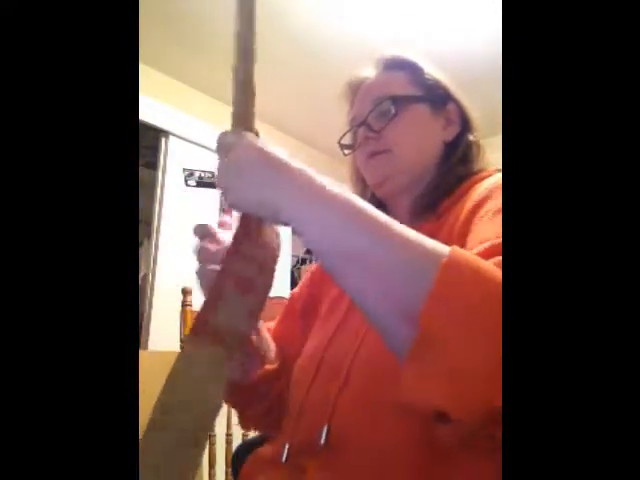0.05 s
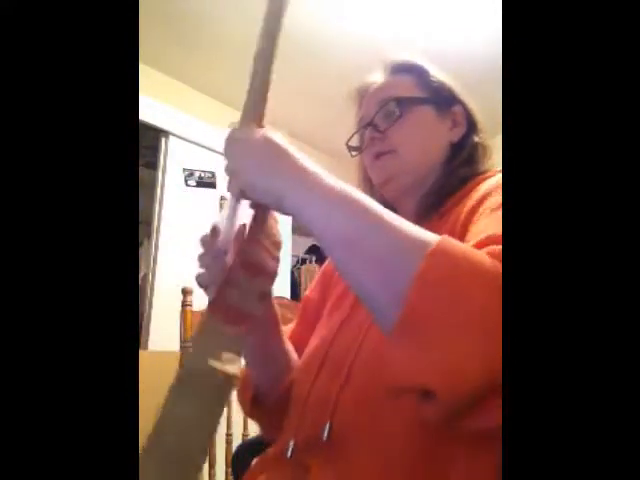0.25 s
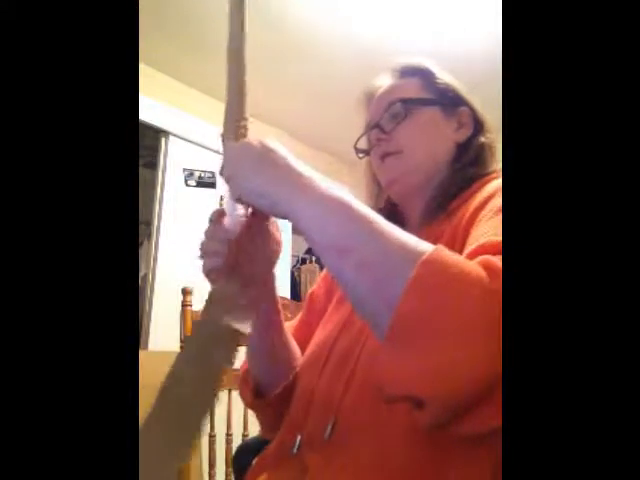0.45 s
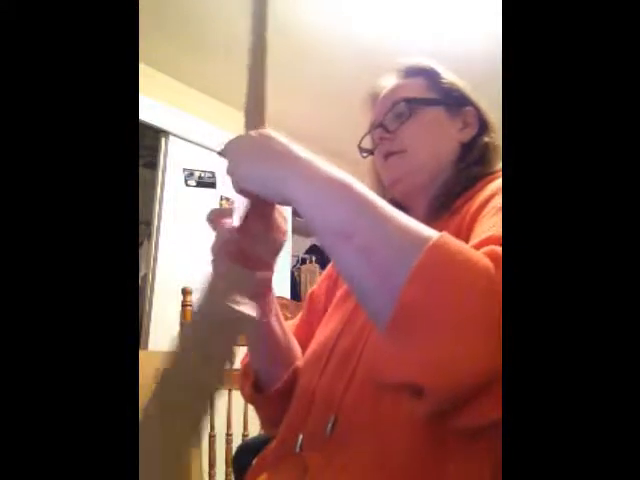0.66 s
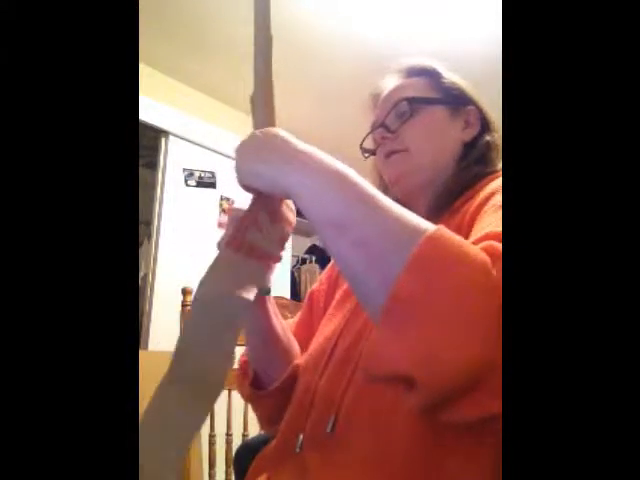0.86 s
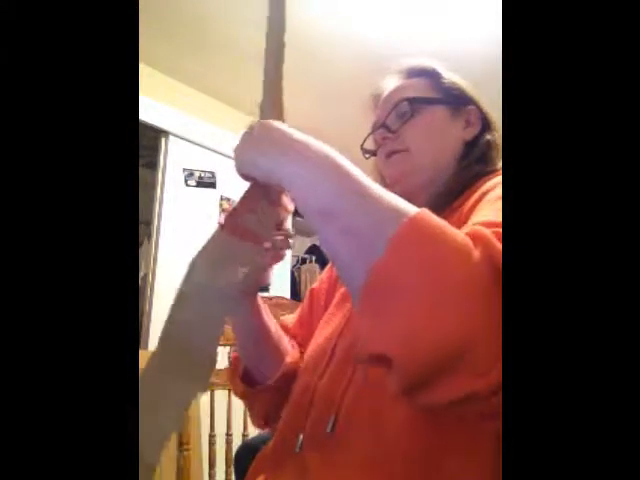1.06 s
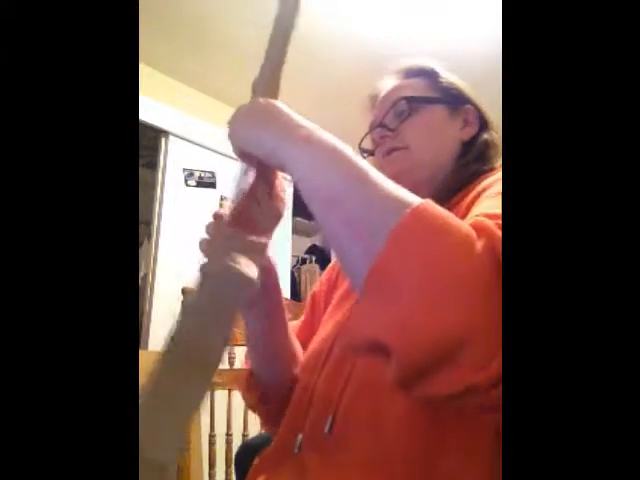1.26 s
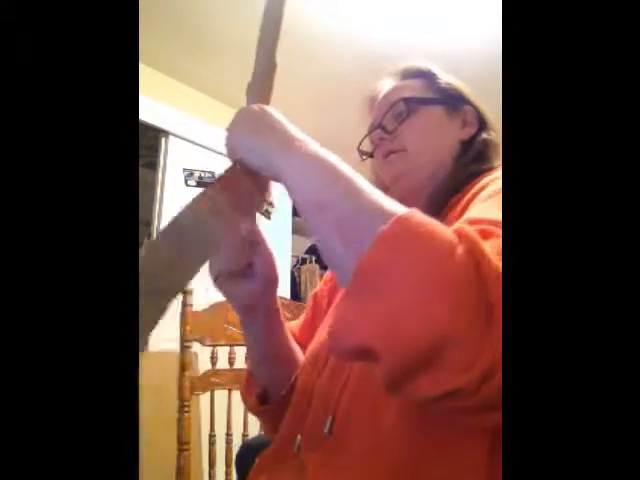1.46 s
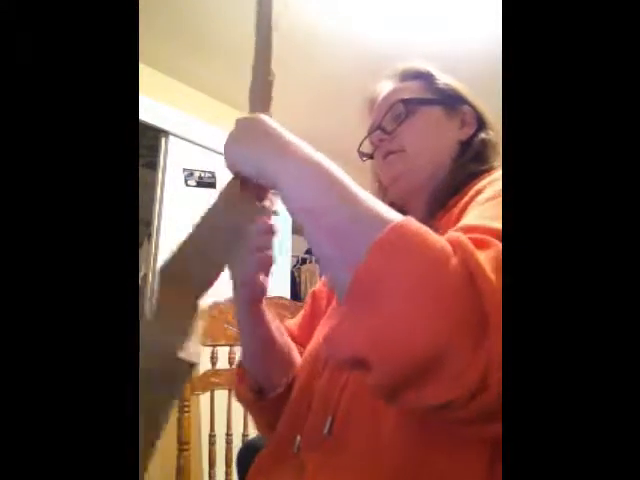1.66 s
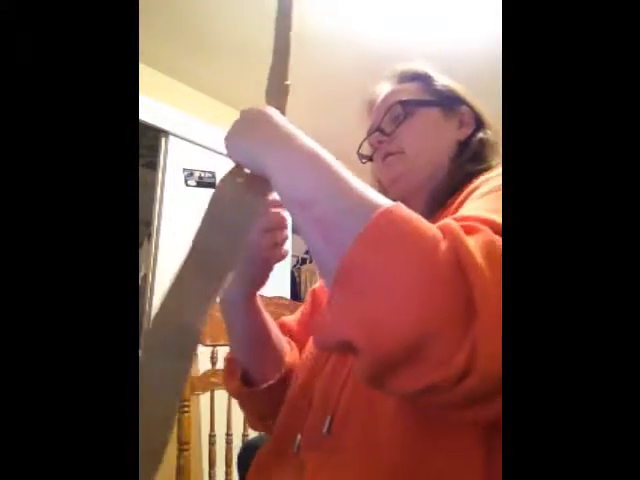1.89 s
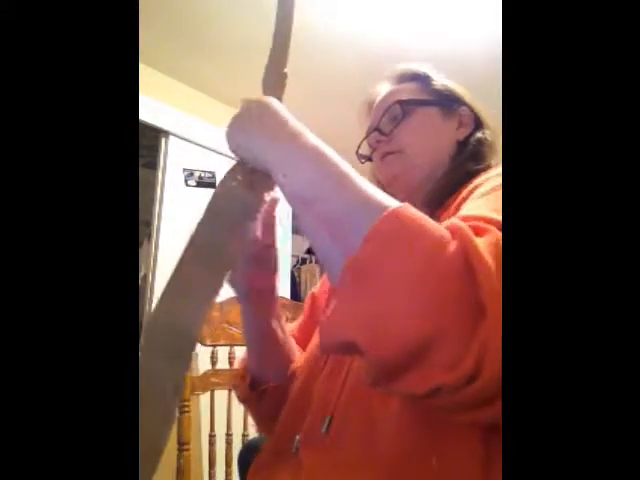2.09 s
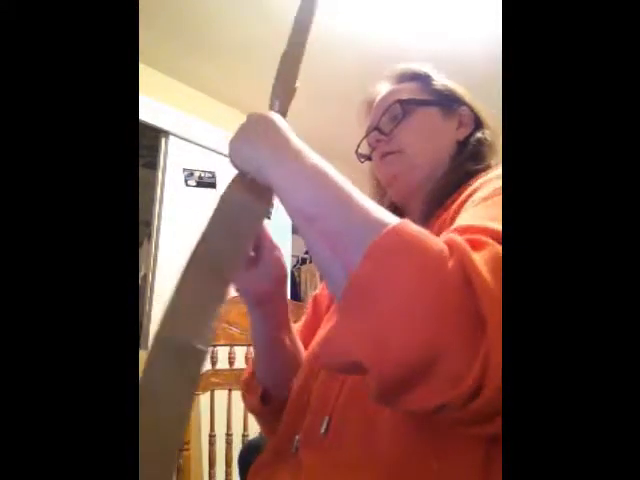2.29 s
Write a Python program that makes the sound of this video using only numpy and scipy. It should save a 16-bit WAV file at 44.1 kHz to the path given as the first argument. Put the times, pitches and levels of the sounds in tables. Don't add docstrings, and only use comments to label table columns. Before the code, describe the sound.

Stiff paper crinkles continuously right beside a small microphone, with sharp crease snaps clustering around the middle and a loudest crack soon after, then thinner rustling; faint rod knocks and room hum behind.

```python
import sys
import numpy as np
from scipy import signal
from scipy.fft import rfft, irfft, next_fast_len
from scipy.io import wavfile

SR = 44100
rng = np.random.default_rng(int(sys.argv[2]) if len(sys.argv) > 2 else 0)


def materialize(psi):
    bounded = np.clip(np.atleast_2d(psi).T, -1, 1)
    quanta = np.round(bounded * 32767).astype(np.int16)
    wavfile.write(sys.argv[1], SR, quanta)


def nominal_scale(level):
    x = np.asarray(level, float) / 20
    return 10 ** x


N = 102753

# f/Hz, level/dB [per Hz]
ROOM_TONE = [(25, -16), (70, -13), (95, -8), (125, 8.5), (300, 6), (1100, -17), (2400, -13.5),
             (14500, -1.5)]
# f/Hz, level/dB [rms]
MAINS_HUM = [(118.4, -84.5), (258.4, -85)]
# t/s, level/dB [peak], pitch scale [ratio]
ROD_KNOCKS = [(0.04, -53, 1.04), (0.422, -31, 0.95), (0.767, -59, 1.05), (0.826, -46, 0.99),
              (0.862, -60, 0.85), (0.946, -54, 1.03), (1.066, -46, 0.89), (1.179, -52.5, 0.85),
              (1.498, -55, 0.98), (1.528, -45, 0.99), (1.571, -40.5, 0.88), (1.589, -56, 0.74)]
# f/Hz, level/dB, damping time/s
ROD_MODES = [(520, -2, .008), (573, 24, 0.0074), (1050, -26, 0.0035)]
# t/s, level/dB [peak]
END_FLAPS = [
    (0.428, -74),
    (0.559, -54),
    (1.068, -43.5),
    (1.589, -46.5),
]
# t/s, level/dB [rustle], level/dB [large folds against small creases]
HAND_EFFORT = [(0, -68.5, 8.5), (0.122, -54.5, -5.5), (0.332, -57.5, -6.5), (0.422, -52, 7.5),
               (.57, -59, -3.5), (.8, -59, -12.5), (1.0, -55, -3.5), (1.14, -57.5, -2.5), (1.3, -58.5, -15),
               (1.45, -51, -14), (1.526, -63.5, 14), (1.628, -46.5, 0), (1.718, -64, -5.5),
               (1.8, -58.5, -8), (1.898, -51.5, -6), (2.035, -68.5, -2), (2.15, -62, -4),
               (2.33, -56.5, -13.5)]
# f/Hz, level/dB [per Hz]
SMALL_CREASES = [(1200, -15), (1700, -13.5), (2600, -4.5), (4500, -2.5), (8500, -1.5), (11000, -7),
                 (15500, -8.5)]
# f/Hz, level/dB [per Hz]
LARGE_FOLDS = [(200, -9.5), (700, -4), (1300, -3), (2200, -5), (3200, -1), (6500, -7.5), (9500, -12),
               (15000, -20)]
# t/s, level/dB [peak], f/Hz [panel pitch], level/dB [shower]
EARLY_SNAPS = [(0.0326, -42.5, 4220, -10), (0.0396, -39, 6960, -12), (0.0433, -40, 4540, -18),
               (0.1237, -57, 3050, -17), (0.186, -39, 2495, -18), (0.2389, -33.5, 4890, -16),
               (0.298, -56, 6100, -21), (0.35, -46, 2770, -21), (0.4226, -37.5, 2400, -21),
               (0.5492, -39, 5900, -25), (0.599, -45.5, 3340, -17), (0.635, -41, 7900, -26),
               (0.7314, -37, 6150, -22), (0.7468, -35, 9750, -28), (0.8189, -38.5, 4440, -14),
               (0.857, -40.5, 6900, -18), (0.9073, -38, 4500, -24), (0.954, -44.5, 3030, -19),
               (0.982, -39.5, 3280, -16), (1.0249, -36, 6600, -18), (1.0279, -34, 3930, -20.5),
               (1.0487, -29.5, 3400, -14.5), (1.0531, -33.5, 3030, -21), (1.0666, -32, 3180, -20.5),
               (1.175, -37, 4700, -14), (1.1809, -32.5, 2320, -18.5), (1.2031, -34, 5300, -29),
               (1.2268, -26.5, 5940, -23), (1.2277, -27.5, 4740, -25), (1.234, -31.5, 7250, -28)]
# t/s, level/dB [peak], f/Hz [panel pitch], level/dB [shower]
LATER_SNAPS = [(1.2764, -42, 3960, -18), (1.3124, -38.5, 4710, -18), (1.3672, -41, 3560, -17),
               (1.4052, -40, 7500, -25), (1.4924, -39.5, 1540, -23), (1.5295, -28, 3940, -14.5),
               (1.5542, -24.5, 2710, -13), (1.5685, -16.5, 5170, -20.5), (1.5744, -50, 6360, -21),
               (1.6104, -29, 3200, -15), (1.8035, -42, 8550, -7), (1.8209, -43, 3960, -11),
               (1.921, -40.5, 2410, -19.5), (2.0004, -52, 4720, -13), (2.0411, -30, 8440, -9.5),
               (2.0782, -41, 3870, -16), (2.2267, -48, 4840, -15), (2.258, -47.5, 3130, -17),
               (2.2963, -49, 3250, -25), (2.311, -46, 4830, -22), (2.3254, -47.5, 2880, -14)]
# multiple of its pitch [ratio], level/dB
PANEL_MODES = [(.62, -6), (0.999, -0.5), (1.26, -6), (1.9, -12)]
# f/Hz, level/dB
STRIP_BODY = [(400, -1), (1700, -2), (2250, 2), (2600, 0.5), (3200, 0.5), (4200, -0.5), (5100, -0.5),
              (10000, -2)]

ROOM_TONE_DB = -66.5
ROOM_T60_S, ROOM_DB = 0.28, -11
FLAP_HZ, FLAP_T60_S = 248, 0.033
GRAINS_PER_S, GRAIN_SPREAD_DB = 3500, 2.9
CLUMP_DB, SLIDE_DB = 2.0, 0.5
LAG_S, RISE_S = 0.0008, 0.0005
CRACK_S, CRACK_DB, RING_Q = 0.0012, -1, 16
SHOWER_T60_S = 0.15


def evened(x):
    return x / np.sqrt(np.mean(x ** 2) + 1e-20)


def colour(x, points, edge_db=-14):
    size = next_fast_len(len(x))
    hz = np.fft.rfftfreq(size, 1 / SR) + 1
    f, db = np.transpose(points)
    octaves_below = np.maximum(np.log2(f[0] / hz), 0)
    gain = nominal_scale(np.interp(np.log(hz), np.log(f), db) + edge_db * octaves_below)
    return irfft(rfft(x, size) * gain, size)[:len(x)]


def around(hz, low_db, high_db):
    return [(hz / 8, 3 * low_db), (hz, 0), (hz * 8, 3 * high_db)]


def add(mix, s, sound):
    part = mix[round(s * SR):][:len(sound)]
    part += sound[:len(part)]


def drift(hz):
    lowpass = signal.butter(2, hz, fs=SR, output="sos")
    return evened(signal.sosfilt(lowpass, rng.standard_normal(N)))


def air():
    t = np.arange(N) / SR
    tone = nominal_scale(ROOM_TONE_DB) * evened(colour(rng.standard_normal(N), ROOM_TONE))
    hum = sum(nominal_scale(db + 3.5 + 1.1 * drift(2.7)) * np.sin(2 * np.pi * hz * t) for hz, db in MAINS_HUM)
    return tone + hum


def room(x):
    t = np.arange(SR // 2) / SR
    tail = rng.standard_normal(len(t)) * nominal_scale(-60 * t / ROOM_T60_S)
    tail *= t > 0.004
    tail = signal.lfilter([1], [1, -0.3], tail)
    return signal.oaconvolve(x, tail / np.linalg.norm(tail))[:N]


def knocks():
    out, t = np.zeros(N), np.arange(6000) / SR
    for start, db, scale in ROD_KNOCKS:
        ring = np.zeros(len(t))
        for hz, mode_db, held in ROD_MODES:
            ring += nominal_scale(mode_db) * np.exp(-(t / held) ** 2) * np.sin(2 * np.pi * hz * scale * t)
        attack = np.minimum(t / 0.0011, 1)
        add(out, start + LAG_S, nominal_scale(db - 4) * attack * ring / abs(ring).max())
    return out


def flaps():
    out, t = np.zeros(N), np.arange(6000) / SR
    thud = np.minimum(t / 0.0055, 1) * np.sin(2 * np.pi * FLAP_HZ * t)
    for start, db in END_FLAPS:
        add(out, start, nominal_scale(db - 60 * t / FLAP_T60_S) * thud)
    return out


def grains():
    struck = rng.random(N) < GRAINS_PER_S / SR
    pops = nominal_scale(GRAIN_SPREAD_DB * np.minimum(rng.exponential(1, N), 4)) * struck
    pitches = np.geomspace(400, 14000, num=24)
    panel = rng.integers(0, len(pitches), N)
    out, t = np.zeros(N), np.arange(900) / SR
    for k, hz in enumerate(pitches):
        ring = np.sin(2 * np.pi * hz * t) * np.exp(-t * hz / 2.5) * np.minimum(t * hz, 1)
        ring *= np.sqrt(hz) / np.linalg.norm(ring)
        out += signal.oaconvolve(pops * (panel == k), ring)[:N]
    return evened(out) + nominal_scale(SLIDE_DB) * rng.standard_normal(N)


def rustle():
    s, effort_db, broad_db = np.transpose(HAND_EFFORT)
    t = np.arange(N) / SR
    fine = evened(colour(grains(), SMALL_CREASES)) * nominal_scale(CLUMP_DB * drift(16.8))
    broad = evened(colour(grains(), LARGE_FOLDS))
    broad *= nominal_scale(CLUMP_DB * drift(20) + np.interp(t, s, broad_db))
    return nominal_scale(np.interp(t, s, effort_db)) * (fine + broad)


def snap(hz, noise):
    t = np.arange(len(noise)) / SR
    rise = np.minimum(t / RISE_S, 1)
    burst = noise * np.exp(-t / CRACK_S) * rise
    crack = colour(burst, around(hz, -8, -10)) * (t < 0.02)
    modes = np.zeros(len(t))
    for (multiple, db), u in zip(PANEL_MODES, noise):
        modes += nominal_scale(db) * np.sin(2 * np.pi * hz * multiple * t + 3 * u)
    ring = modes * rise * np.exp(-np.pi * hz * t / RING_Q)
    sound = ring / abs(ring).max() + nominal_scale(CRACK_DB) * crack / abs(crack).max()
    return sound / abs(sound).max()


def snaps():
    out, t = np.zeros(N), np.arange(SR // 4) / SR
    crackle = grains() * nominal_scale(CLUMP_DB * drift(120))
    rows = EARLY_SNAPS + LATER_SNAPS
    for (start, db, hz, shower_db), noise in zip(rows, rng.standard_normal((len(rows), 1200))):
        add(out, start + LAG_S, nominal_scale(db) * snap(hz, noise))
        stretch = np.roll(crackle, -round(start * SR))[:len(t)]
        shower = evened(colour(stretch, around(hz, -4.5, -8)))
        decay = nominal_scale(db + shower_db - 60 * t / SHOWER_T60_S) * np.minimum(t / 0.0016, 1)
        add(out, start + LAG_S, decay * shower)
    return out


def scene():
    near = colour(snaps() + rustle(), STRIP_BODY) + knocks() + flaps()
    low_cut = signal.butter(4, 190, "high", fs=SR, output="sos")
    near = signal.sosfilt(low_cut, near)
    return (near + nominal_scale(ROOM_DB) * room(near) + air())[None]


def band_limit(x):
    return signal.sosfilt(signal.butter(12, 16250, fs=SR, output="sos"), x)


def record(dry):
    treble_limit = signal.firwin(255, 15450, fs=SR)
    band = signal.oaconvolve(dry, treble_limit[None], "same")
    return band_limit(band)


dry = scene()
out = record(dry)
materialize(out)
```